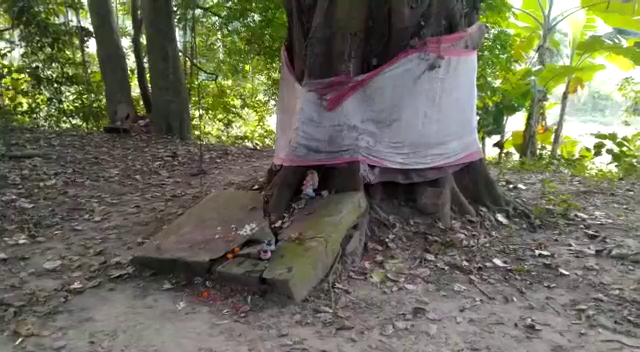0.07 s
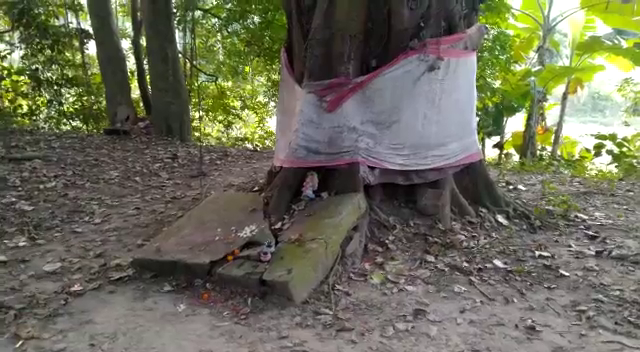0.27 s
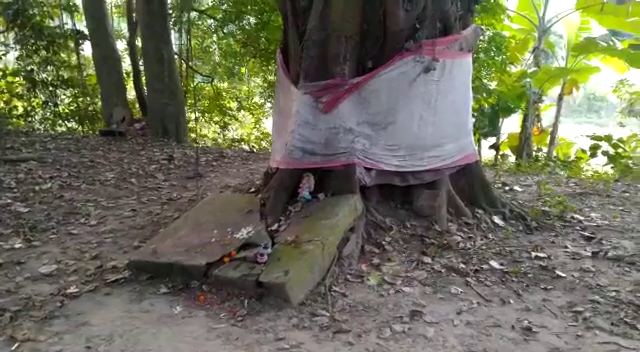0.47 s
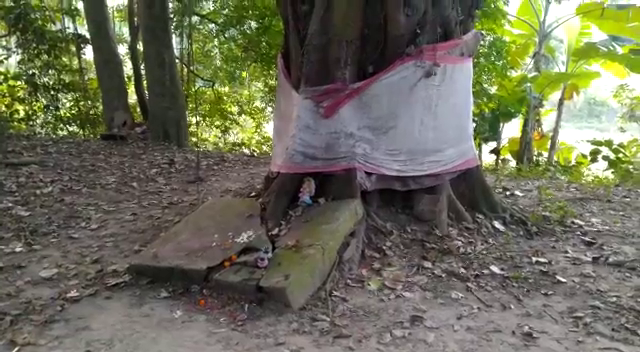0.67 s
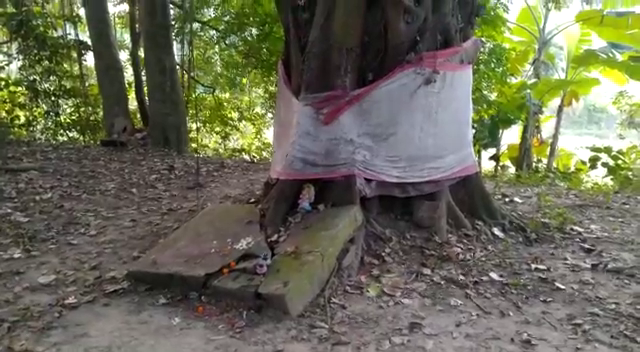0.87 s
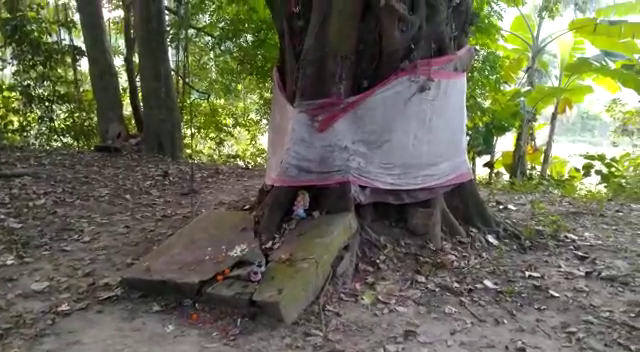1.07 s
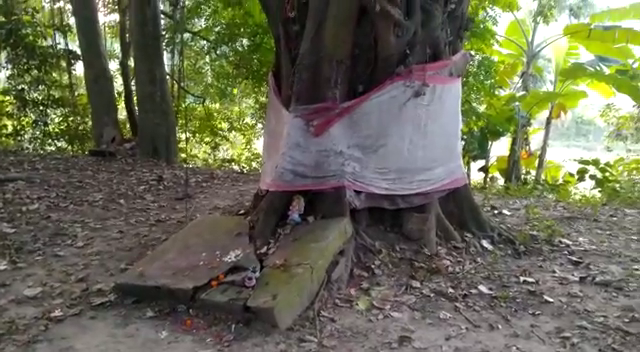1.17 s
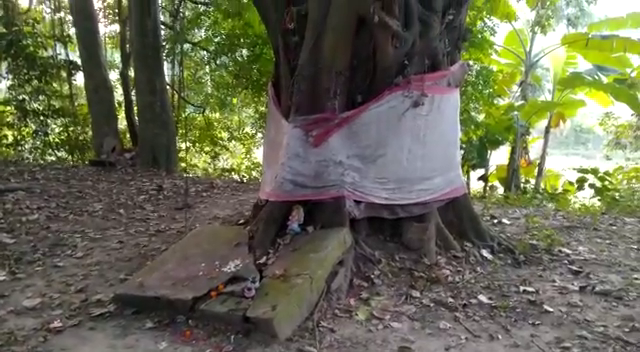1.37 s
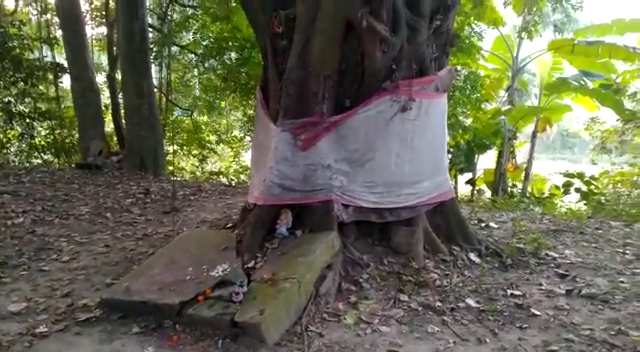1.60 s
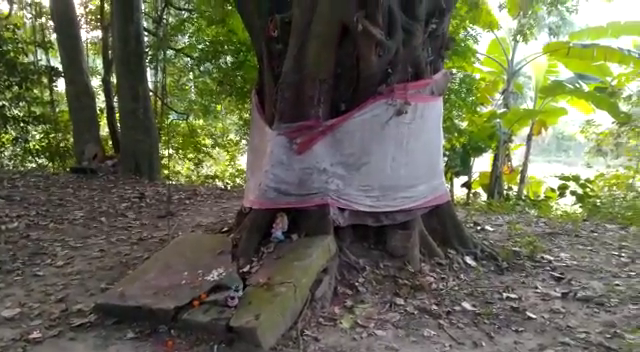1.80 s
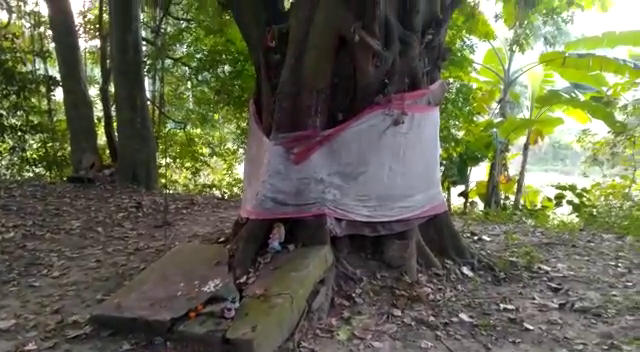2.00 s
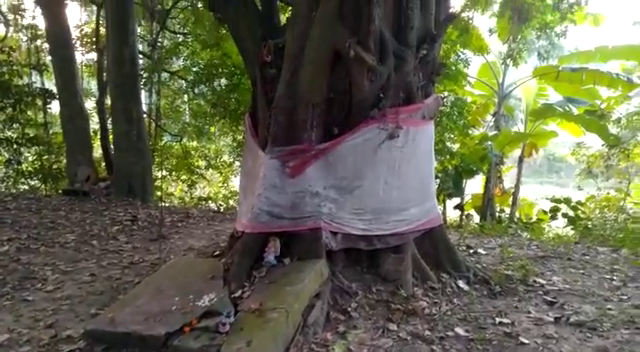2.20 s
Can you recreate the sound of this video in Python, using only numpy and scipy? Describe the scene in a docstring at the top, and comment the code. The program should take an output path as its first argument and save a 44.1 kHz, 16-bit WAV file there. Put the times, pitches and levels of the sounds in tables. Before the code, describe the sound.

In a quiet grove, a bird gives two phrases of four short hoots on nearly one pitch, each trailing off softly among the trees. Faint high insects, a few dry leaf ticks and a far low hum lie underneath.

```python
"""A quiet grove. A bird hoots two phrases of four short, nearly pure notes; each phrase opens with a
falling note. Trunks scatter the hoots into a soft tail. Dry leaves tick and rustle, insects hiss high up
and buzz in faint swells, something far off hums. The scene fades in with a few soft clicks."""
import sys
import numpy as np
from scipy import signal
from scipy.fft import rfft, irfft
from scipy.io import wavfile

SR = 44100
rng = np.random.default_rng(int(sys.argv[2]) if len(sys.argv) > 2 else 0)


def waveform_to_disk(signal):
    """Save audio, clipped to [-1, 1], as 16-bit WAV at the path in sys.argv[1]."""
    frames = np.transpose(np.atleast_2d(signal))
    scaled = np.clip(frames, -1, 1) * 32767
    samples = np.round(scaled).astype(np.int16)
    wavfile.write(sys.argv[1], SR, samples)


N = 99225
T = np.arange(N) / SR

# hoots: start/s, length/s, level/dB, settled f/Hz, overshoot/Hz, its peak after start/s, rasp/dB re note
HOOTS = [(0.325, 0.043, -36, 1196, 107, 0.012, -21), (0.407, 0.037, -33.5, 1205, 15, 0.012, -34),
         (0.476, 0.035, -35, 1207, 25, 0.017, -36), (0.547, 0.033, -34.5, 1194, 16, 0.011, -34),
         (1.712, 0.044, -31.5, 1195, 102, 0.012, -19), (1.797, 0.036, -30.5, 1176, 17.3, 0.018, -31),
         (1.867, 0.032, -30.5, 1193, 16.3, 0.008, -34), (1.945, 0.031, -31.2, 1181, 19, .013, -34)]
# throat air spectrum: f/Hz, relative level/dB
AIR_SPECTRUM = [(300, -17), (500, -10), (900, 12.5), (1300, 0), (1650, -13), (2100, 6.5), (2600, -6),
                (3400, -18), (6000, -36)]
# onset rasp spectrum: f/Hz, relative level/dB
RASP_SPECTRUM = [(400, -18), (900, -12), (1300, -6), (1600, -4), (2050, 2.5), (2400, -13.5), (3000, -25),
                 (6000, -30)]
# leaf ticks: t/s, level/dB
TICKS = [(1.2828, -53.5), (1.8963, -57), (1.9986, -51), (2.079, -65)]
# tick spectrum: f/Hz, relative level/dB
TICK_SPECTRUM = [(150, 11.5), (500, 5), (1500, -8.5), (4000, -9), (10000, -14), (15000, -29)]
# leaf rustles: centre t/s, length/s, level/dB
RUSTLES = [(.56, 0.23, -67.5), (1.23, 0.19, -68.5), (1.702, 0.1, -64), (1.848, 0.15, -63.5),
           (2.212, 0.061, -62)]
# rustle spectrum: f/Hz, relative level/dB
RUSTLE_SPECTRUM = [(200, -18.5), (380, -1.5), (540, 8), (800, -3), (1300, -5.5), (1900, -0.5),
                   (2700, -14.5), (4500, -28)]
# insect hiss spectrum: f/Hz, relative level/dB
HISS_SPECTRUM = [(3500, -21.5), (6200, -26), (8200, -26.5), (9500, -19), (11200, -28.5), (12300, -19),
                 (13000, -17.5), (13800, -11.5), (15000, -13.5), (15450, 3), (15680, -10.5), (15900, -10)]
# insect trill envelope: t/s, level/dB
TRILL_LEVELS = [(0, -79.5), (.85, -86.5), (1.3, -80.5), (1.75, -81), (2.25, -85)]
# insect buzzes: centre t/s, length/s, level/dB, f/Hz
BUZZES = [(0.46, 0.16, -82, 5060), (1.013, 0.12, -77, 5100), (1.204, 0.088, -74, 5040),
          (1.454, 0.086, -76, 4950), (1.755, 0.24, -78.5, 5020), (2.222, 0.28, -79, 5450)]
# far hum partials: f/Hz, level/dB
HUM_PARTIALS = [(63.5, -59), (94.6, -65), (125, -65)]
# far drones: f/Hz, level/dB
DRONES = [(474, -77.5), (524, -79.5), (620, -79.5), (788, -83), (926, -82.5), (1295, -79)]
# distant air and foliage spectrum: f/Hz, relative level/dB
FLOOR_SPECTRUM = [(20, 0.5), (32, 2.5), (45, -7), (85, -4), (135, -2), (185, -8.5), (240, -16),
                  (350, -18.5), (490, -16.5), (720, -19.5), (1050, -21), (1450, -24), (1900, -22),
                  (2600, -23), (3300, -32), (4200, -43.5), (8000, -42), (16000, -57)]
# gain on all insect and far levels: t/s, gain/dB
BACKGROUND_GAIN = [(0, -3.5), (.32, -3.5), (.6, -0.5), (1.1, 0), (2.25, 1.5)]
# backward steps of the fade-in: t/s, drop/share of full gain
FADE_SLIPS = [(.1095, 0.091), (0.169, 0.1), (0.2094, 0.12), (0.2499, 0.17), (0.3103, 0.17)]


def bird(attack_s=.014, release_s=.012, overshoot_width_s=.01, slack_hz=22.2, rasp_s=.0047):
    """Near-sine hoots: pitch overshoots, settles, sags at low effort. Throat air, rasp at onset."""
    out, air, grit = np.zeros(N), from_db(-33) * noise(AIR_SPECTRUM), noise(RASP_SPECTRUM)
    waver_hz, waver_gain = 3.1 * drift(140), from_db(.47 * drift(100))
    octave_gain = from_db(-30.5 + 3.5 * drift(350))
    harmonic_gains = [1, octave_gain, from_db(-54), from_db(-46.5)]
    for start_s, length_s, db, hz, peak_hz, peak_s, rasp_db in HOOTS:
        t = T - start_s
        effort = ease(t / attack_s) * ease((length_s - t) / release_s)
        overshoot_hz = peak_hz * np.exp(-((t - peak_s) / overshoot_width_s) ** 2)
        pitch_hz = hz + overshoot_hz - slack_hz * (1 - effort) + waver_hz
        phase = 2 * np.pi * np.cumsum(pitch_hz * (t > 0)) / SR
        tone = sum(gain * np.sin(k * phase) for k, gain in enumerate(harmonic_gains, 1))
        voice = waver_gain * from_db(-.0039 * overshoot_hz) * tone  # weaker during overshoot
        rasp = from_db(rasp_db) * np.exp(-(t / rasp_s) ** 2) * grit
        out += from_db(db) * (effort * (voice + air) + rasp)
    return out


def trunk_echoes(x, first_echo_s=.016, echoes_per_s=990):
    """Many weak echoes off near trunks; a longer tail from the far wood."""
    t = T[:SR] - first_echo_s
    response = np.zeros(SR)
    for db, t60_s in ((-14, .3), (-24.5, 1.9)):  # near, far
        impulses = rng.choice([-1, 1], SR) * (rng.random(SR) < echoes_per_s / SR)
        decay = (t > 0) * from_db(-60 * t / t60_s)
        response += from_db(db) * rms_one(impulses * decay) / np.sqrt(SR)
    return signal.fftconvolve(x, response)[:N]


def leaves(tick_decay_s=.0035, flutter_db=3.2):
    """Dry leaves: sharp noise ticks, soft fluttering rustles."""
    tick_env = sum(from_db(db) * (T >= s) * np.exp(-np.abs(T - s) / tick_decay_s) for s, db in TICKS)
    ticks = tick_env * noise(TICK_SPECTRUM)
    rustle_env = sum(from_db(db) * swell(s, length_s) for s, length_s, db in RUSTLES)
    return ticks + rustle_env * from_db(flutter_db * drift(73)) * noise(RUSTLE_SPECTRUM)


def insects(hiss_db=-61, flutter_db=1.0):
    """High hiss, thin trill, lower buzzes that swell and fade."""
    hiss = from_db(hiss_db + flutter_db * drift(88)) * noise(HISS_SPECTRUM)
    trill = gain_curve(TRILL_LEVELS) * narrow_noise(hz=7097, width_oct=.044)
    buzzes = sum(from_db(db) * swell(s, length_s) * narrow_noise(hz, width_oct=.073)
                 for s, length_s, db, hz in BUZZES)
    return hiss + trill + buzzes


def far_surroundings(hum_waver_db=3, drone_sway_db=3.5, floor_db=-59.5, floor_sway_db=1.38):
    """Low wavering hum, faint drones, noise of distant air and foliage."""
    hum = 0
    for hz, db in HUM_PARTIALS:
        pitch_hz = hz * (1 + .0389 * drift(11.6))
        phase = 2 * np.pi * np.cumsum(pitch_hz) / SR
        hum += np.sqrt(2) * from_db(db + hum_waver_db * drift(18)) * np.sin(phase)
    drones = sum(from_db(db + drone_sway_db * drift(2.2)) * narrow_noise(hz, width_oct=.028)
                 for hz, db in DRONES)
    floor = from_db(floor_db + floor_sway_db * drift(15.7)) * noise(FLOOR_SPECTRUM)
    return hum + drones + floor


def from_db(db):
    """dB to gain."""
    return 10 ** (np.asarray(db) / 20)


def gain_curve(points):
    """Gain over time from (t/s, level/dB) points."""
    return from_db(np.interp(T, *np.transpose(points)))


def rms_one(x):
    """Scale to unit rms."""
    return x / np.sqrt(np.mean(x ** 2) + 1e-20)


def noise(spectrum):
    """Unit-rms noise shaped by (f/Hz, level/dB) points."""
    hz, db = np.transpose(spectrum)
    f = np.maximum(np.fft.rfftfreq(N, 1 / SR), 1)
    shape = from_db(np.interp(np.log(f), np.log(hz), db))
    return rms_one(irfft(rfft(rng.standard_normal(N)) * shape, N))


def narrow_noise(hz, width_oct):
    """Unit-rms noise in a bell-shaped band."""
    f = np.maximum(np.fft.rfftfreq(N, 1 / SR), 1)
    bell = np.exp(-(np.log2(f / hz) / width_oct / 2) ** 2)
    return rms_one(irfft(rfft(rng.standard_normal(N)) * bell, N))


def drift(rate_hz):
    """Zero-mean, unit-rms random wander, mostly below rate_hz."""
    f = np.fft.rfftfreq(N, 1 / SR)
    lowpass = (f > 0) / (1 + (f / rate_hz) ** 2) ** 2
    return rms_one(irfft(rfft(rng.standard_normal(N)) * lowpass, N))


def swell(centre_s, length_s):
    """Gaussian rise and fall."""
    return np.exp(-2 * ((T - centre_s) / length_s) ** 2)


def ease(u):
    """Smooth step, 0 to 1."""
    return np.sin(np.pi / 2 * np.clip(u, 0, 1)) ** 2


def scene():
    """Bird, echoes and leaves over the background; mono."""
    hoots = bird()
    foreground = hoots + trunk_echoes(hoots) + leaves()
    background = gain_curve(BACKGROUND_GAIN) * (insects() + far_surroundings())
    return (foreground + background)[None]


def record(dry, settle_s=1.064, fade_start_s=.076, fade_per_s=6.22, cutoff_hz=15880):
    """Fade-in over a settling offset, clicking where the gain slips back; steep low-pass."""
    offset = -.031 * np.exp(-(T / settle_s) ** 2)
    slipped = sum(drop * (T >= s) for s, drop in FADE_SLIPS)
    fade = np.clip(fade_per_s * (T - fade_start_s) - slipped, 0, 1)
    lowpass = signal.ellip(12, .1, 80, cutoff_hz, fs=SR, output="sos")
    return signal.sosfilt(lowpass, fade * (dry + offset) + 1e-18)


dry = scene()
out = record(dry)
waveform_to_disk(out)
```